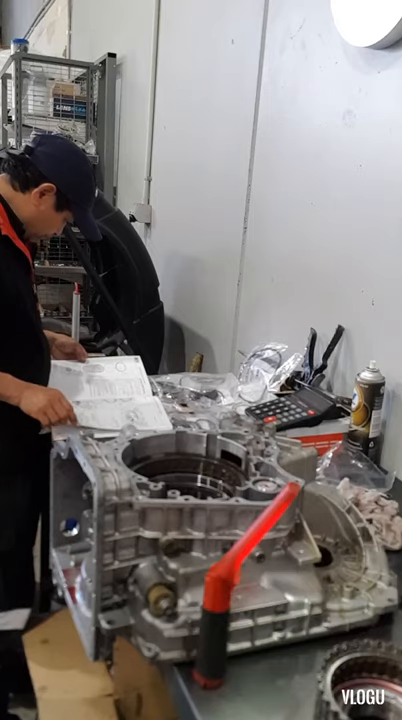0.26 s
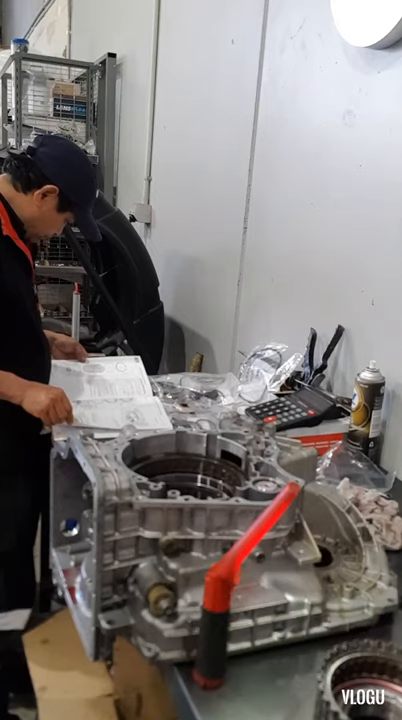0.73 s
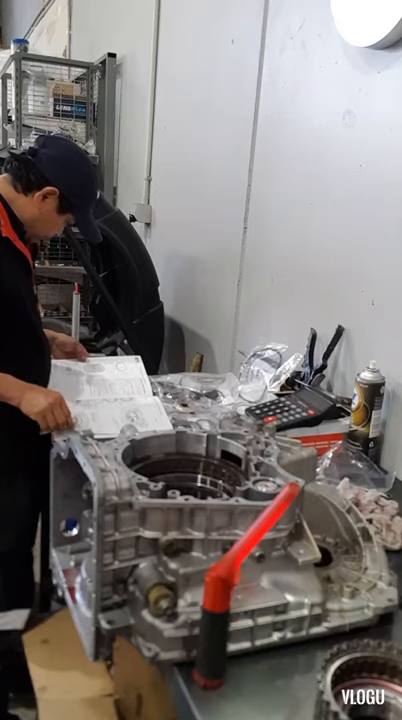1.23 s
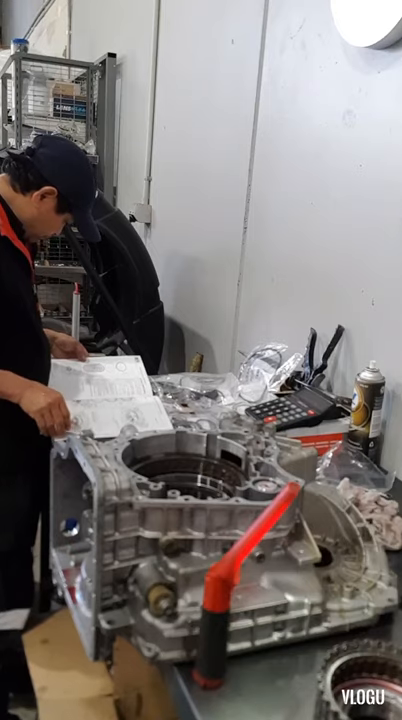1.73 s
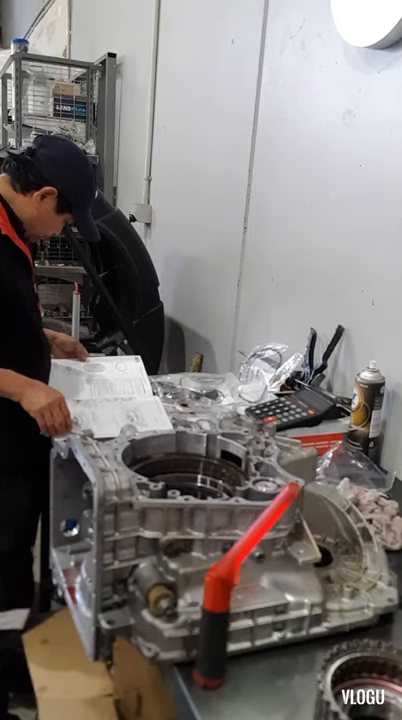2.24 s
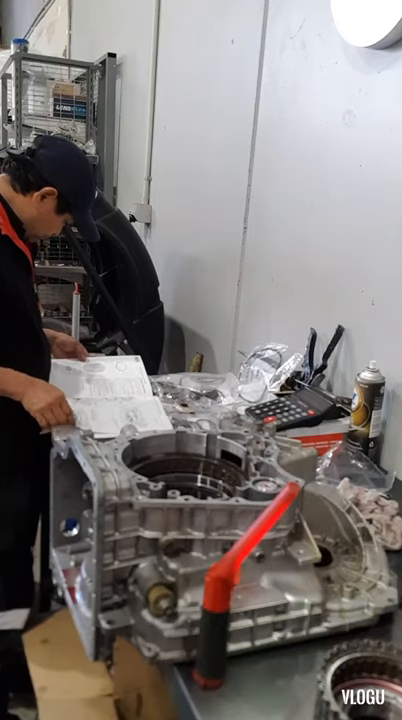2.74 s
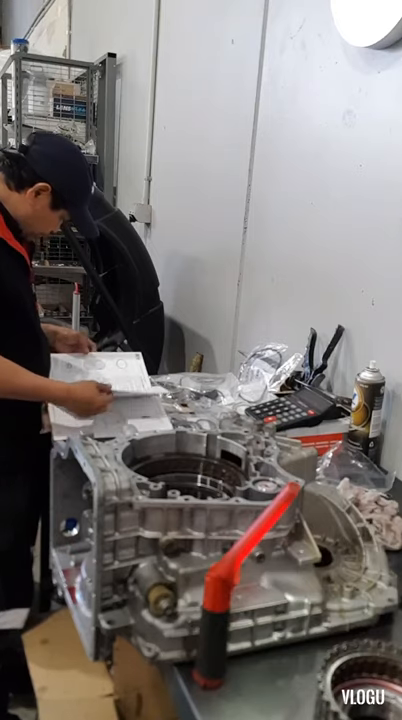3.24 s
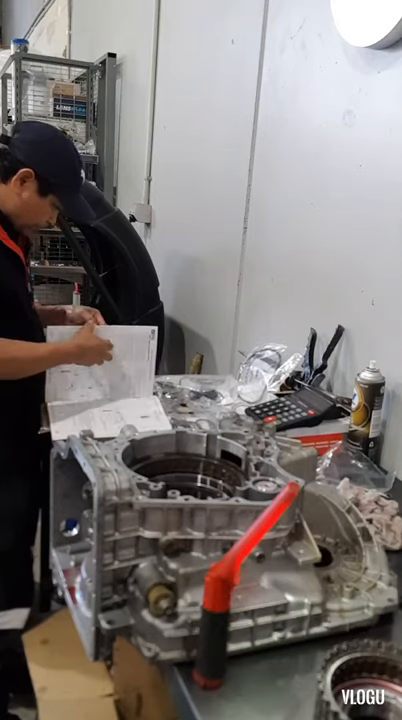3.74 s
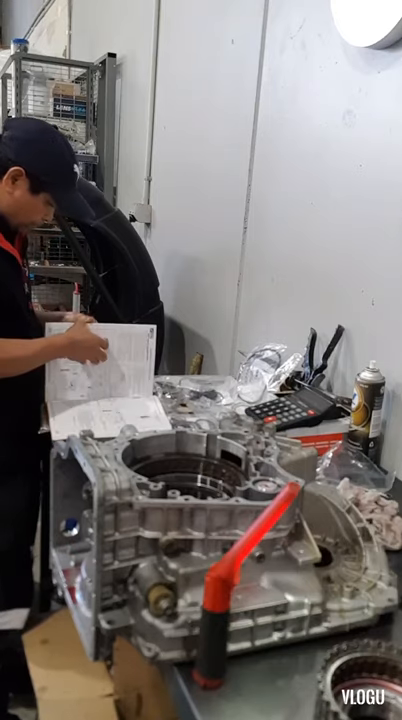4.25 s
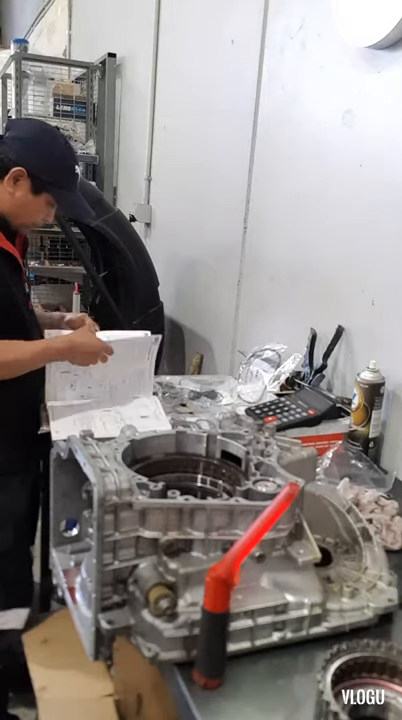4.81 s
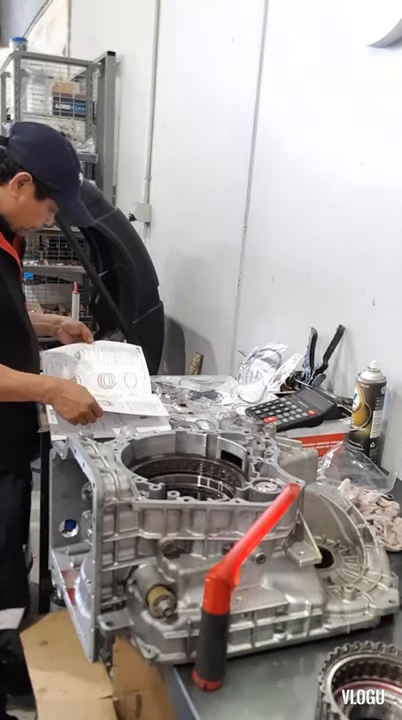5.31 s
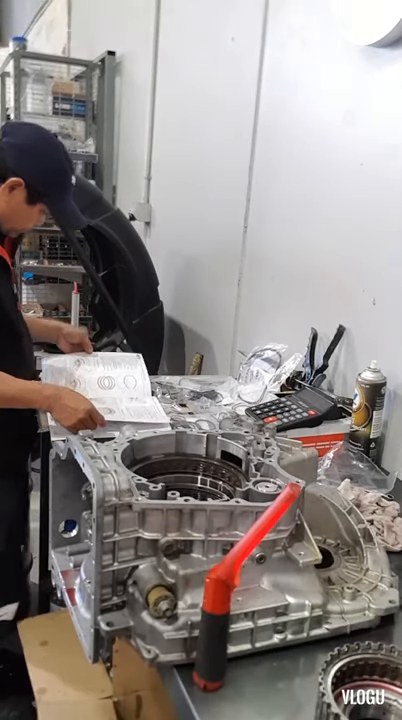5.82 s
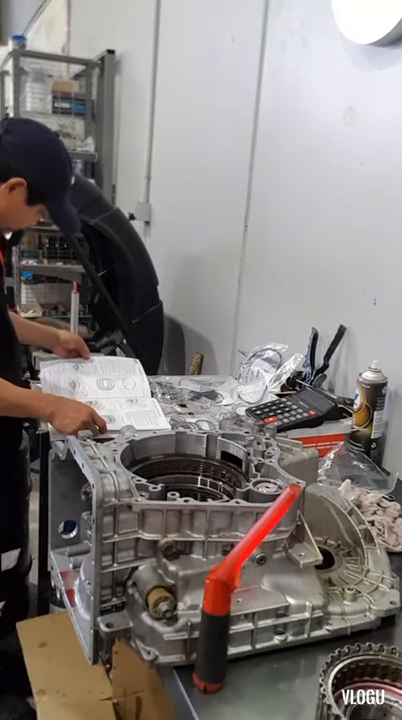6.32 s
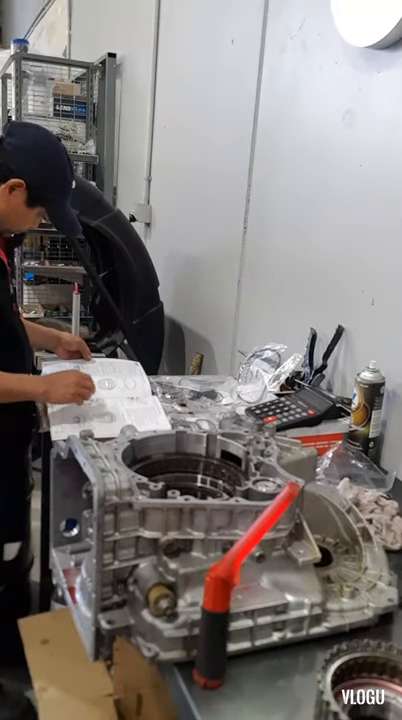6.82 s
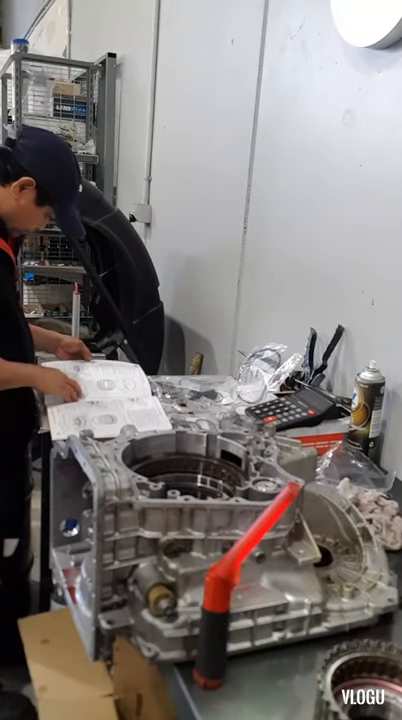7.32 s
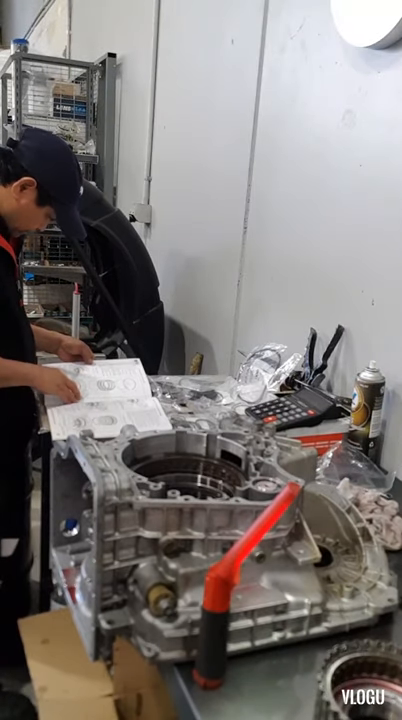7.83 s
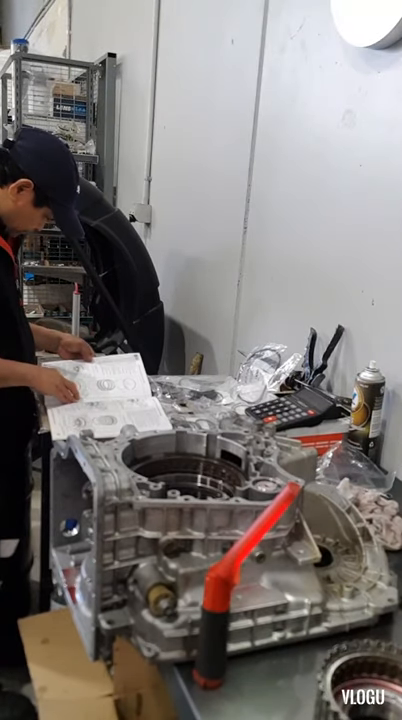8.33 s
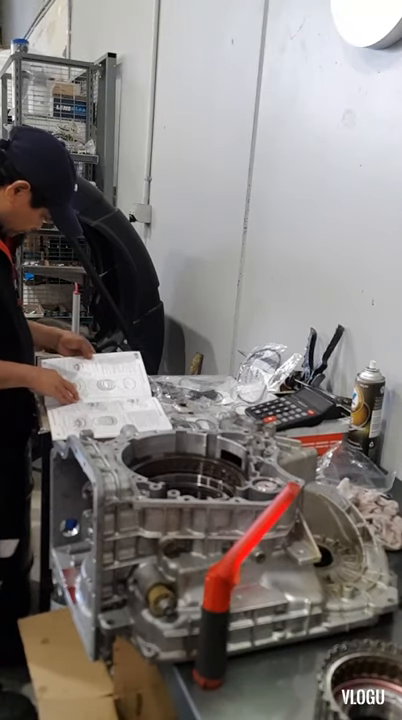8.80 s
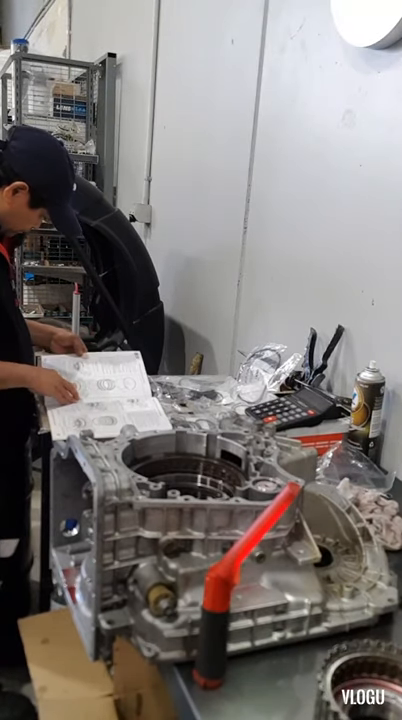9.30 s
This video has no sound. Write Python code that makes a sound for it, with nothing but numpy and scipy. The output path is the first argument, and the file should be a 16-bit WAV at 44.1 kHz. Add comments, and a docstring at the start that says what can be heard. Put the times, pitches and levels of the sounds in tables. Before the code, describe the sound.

An air gun hisses loudly in a hard-walled workshop, first briefly, then in one long blast of about three seconds. A run of short, sharp bursts with a faint whistle follows, each ringing on in the hall. Dull thumps land on a bench among the later bursts. The air then stops, leaving a few distant metal clacks over the low rumble and hum of machines, all picked up by one microphone.

```python
"""An air gun hisses in long and short bursts across a hard-walled workshop, and the hall rings on after each.
The hiss is a turbulent jet behind a snappy valve, with a faint nozzle whistle; on a long pull the hose
pressure sags and the jet dulls. Metal parts clack far off, and things set down on a bench thump its low
modes. Machines rumble and hum underneath. One microphone, the same on both channels."""
import sys
import numpy as np
from scipy import signal
from scipy.fft import rfft, irfft
from scipy.io import wavfile

SR = 44100
rng = np.random.default_rng(int(sys.argv[2]) if len(sys.argv) > 2 else 0)


def store_pcm(level_fs):
    """Save levels as 16-bit WAV."""
    pcm = np.round(np.clip(level_fs, -1, 1) * 32767).astype(np.int16)
    wavfile.write(sys.argv[1], SR, np.atleast_2d(pcm).T)


N = 421596
LEAD = SR // 2  # pre-roll in samples: the jet already blows before time zero

# Trigger pulls. Each row: valve opening, valve shutting and squeeze time in seconds, flow level in dB,
# its ramp over the pull in dB, aim as treble tilt in dB per octave, whistle against the jet in dB.
TRIGGER_PULLS = [(-.5, 0.86, .03, -30, 1, 1, -55), (1.205, 4.094, 0.061, -31, 1.5, 1, -46),
                 (4.262, 4.457, .02, -30, 0.8, 0.5, -34), (4.538, 4.718, .02, -29.5, 0.7, 1, -29),
                 (4.785, 4.953, .02, -29, -0.7, 0.5, -40), (5.06, 5.248, .02, -29, .3, 2, -28.5),
                 (5.762, 5.935, 0.018, -29, -0.6, 1.5, -26.5), (6.026, 6.2, .02, -28.5, -0.9, 1, -29),
                 (6.292, 6.633, 0.036, -28, -0.5, 0.8, -26), (6.81, 7.177, .04, -29, -0.2, 1, -28.5),
                 (7.31, 7.521, 0.045, -29, 0.8, 0.6, -25)]
# Colour of the jet. Each row: frequency in Hz, spectral level in dB.
JET_SPECTRUM = [(500, -35), (900, -28.5), (1420, -18.5), (1750, -13.5), (3100, -9), (3700, -5.5),
                (4200, 0.5), (5080, -0.5), (5940, -6), (6680, -4.5), (7620, -12.5), (9380, -1),
                (10800, 0.5), (12500, -5), (15800, -14.5)]
# Decay of the hall. Each row: frequency in Hz, time to fall 60 dB in seconds.
HALL_DECAY = [(100, 1.4), (500, 1.5), (1500, 1.09), (3000, 1.48), (5000, 1.35), (8000, 0.91), (11000, 0.66),
              (15000, 0.4)]
# Metal clacks. Each row: start in seconds, level in dB, rattle time in seconds, tilt in dB per octave,
# low ring in Hz, its boost in dB, high ring in Hz, its boost in dB.
CLACK_HITS = [(4.925, -49, 0.019, 1, 1750, -3, 4500, 2), (8.27, -57, 0.034, -2.5, 1560, 6, 4500, 6),
              (8.652, -51.5, 0.0069, -2.5, 3350, 15, 10000, 15), (8.670, -46, 0.006, 5, 2580, 10, 11400, 1),
              (9.288, -52.5, 0.007, 0, 10500, 11, 14800, 9), (9.3, -46.5, 0.014, 0, 1340, 3, 4670, 6.5)]
# Colour shared by all clacks. Each row: frequency in Hz, spectral level in dB.
CLACK_SPECTRUM = [(180, -12), (300, -5), (572, -3), (721, -0.5), (1070, -1.5), (1310, 0), (1980, -0.5),
                  (2490, -2), (3520, -14), (4370, -8), (7660, -20), (11600, -17), (15600, -28)]
# Things landing on the bench. Each row: start in seconds, level in dB, hardness as tilt in dB per octave,
# pitch factor for the spot that is hit.
BENCH_HITS = [(5.362, -34, -4.5, 0.8), (5.406, -33, -10, 0.74), (5.583, -47, 0, 1.01),
              (5.7, -44.5, -0.5, 0.95), (6.699, -50, 3, 0.95), (6.71, -35, -2, 1.06),
              (6.743, -37, -5, 1.04), (6.8, -42, -3, 0.95), (7.426, -47.5, 5.5, 0.99),
              (7.446, -42, 0, 1.01), (8.718, -42, -1, 0.93), (9.321, -53, 4, 1.07)]
# Modes of the bench. Each row: frequency in Hz, level in dB, time to fall 60 dB in seconds.
BENCH_MODES = [(71, -5.5, 0.2), (131.5, 0.5, 0.19), (214, -5.5, 0.15), (407, -11, 0.13), (774, -6.5, 0.062)]
# Colour of the machine wash. Each row: frequency in Hz, spectral level in dB.
WASH_SPECTRUM = [(53, -19), (90, 5.5), (117, -33), (148, -13), (238, -13), (352, -17.5), (383, -20),
                 (566, -17), (658, -21.5), (766, -17), (1430, -19), (2360, -22), (5250, -28), (7580, -40.5),
                 (15800, -35)]
# Swells of the distant machines. Each row: time in seconds, wash level in dB, drone level in dB,
# extra body on the wash at 180-340 Hz in dB.
MACHINE_SWELLS = [(0.0, -51.5, -48, 3), (0.69, -52.5, -54, 2.5), (0.93, -53, -48, 2), (1.62, -53, -54, 2),
                  (4.79, -51, -52, 1.5), (5.03, -51.5, -53.5, 0), (5.46, -51, -49.5, 2.5),
                  (5.93, -51, -53.5, 1.5), (6.5, -52.5, -48, 1), (6.84, -54, -57, 1.5),
                  (7.37, -52, -49.5, 0), (8.49, -51, -51.5, 1), (8.89, -51, -46.5, 2),
                  (9.56, -49.5, -50, 0.5)]
# Low drones. Each row: frequency in Hz, width in Hz, relative level in dB.
DRONES = [(41.85, 7.2, -4.5), (58.3, 3.9, -2), (76.7, 3.6, -2.5), (95.2, 8.8, -26)]
# Motor hums and whines. Each row: frequency in Hz, width in Hz, level in dB, on and off times in seconds.
MOTOR_TONES = [(153, 3.9, -74, 7.6, 10), (191.8, 5.2, -70, -1, 10), (352, 6, -67, 7.65, 8.55),
               (576, 9, -72, -1, 10), (700, 6, -64, 8.85, 10), (940, 8, -65, 8.95, 10),
               (1500, 60, -61, 8.85, 10), (11050, 80, -84, 8.22, 8.66), (13450, 70, -77.5, 5, 8.66),
               (15350, 40, -82, 5, 8.66)]

OPEN_S, SHUT_S, WEAK_START_DB = .012, .015, -2.5  # the valve snaps; flow is weaker during the squeeze
SAG_DB, SAG_DB_PER_OCTAVE, SAG_S = -2.5, -0.97, 0.63  # falling hose pressure: quieter and duller
WHISTLE_HZ, WHISTLE_WIDTH_HZ = 1760, 45
DIRECT_DB, DIRECT_DB_PER_OCTAVE = -6, 1.8  # the jet's straight path, tilted around 8 kHz
FIZZ_OFF_S, FIZZ_DROP_DB = 8.7, -4  # the wash over 9 kHz falls as the highest whines stop


def air_gun():
    """Turbulent jet noise behind a quick valve; the aim tilts the treble, and the nozzle whistles."""
    opens, *_, aims, _ = np.transpose(TRIGGER_PULLS)

    def jet_db(hz, t):
        """Jet colour, tilted by the aim and pressure of the current pull; the level flutters slightly."""
        pull = np.maximum(np.searchsorted(opens, t) - 1, 0)
        tilt = aims[pull] + SAG_DB_PER_OCTAVE * pressure_sag(t, opens[pull])
        return curve(JET_SPECTRUM, hz) + tilt * octaves(hz, 8800) + 0.6 * drift(t, top_hz=7.9)

    jet = unit_rms(shaped_noise(jet_db))
    whistle = wavering_tone(WHISTLE_HZ, WHISTLE_WIDTH_HZ, steady=0)
    t, out = (np.arange(N + LEAD) - LEAD) / SR, np.zeros(N + LEAD)
    for start, end, squeeze_s, flow_db, ramp_db, _, whistle_db in TRIGGER_PULLS:
        valve = np.clip((t - start) / OPEN_S, 0, 1) * np.clip((end - t) / SHUT_S, 0, 1)
        squeeze_db = WEAK_START_DB * np.exp(-abs(t - start) / squeeze_s)
        progress = np.clip((t - start) / (end - start), 0, 1)
        flow = gain(flow_db + squeeze_db + SAG_DB * pressure_sag(t, start) + ramp_db * progress)
        out += valve * flow * (jet + gain(whistle_db) * whistle)
    return out


def pressure_sag(t, start):
    """The hose loses pressure once the valve opens: 0 at first, 1 when fully sagged."""
    return 1 - np.exp(-np.maximum(t - start, 0) / SAG_S)


def direct_beam(jet, size=2 ** 19):
    """The jet beams its treble, so the straight path is brighter than what feeds the hall."""
    beam_db = DIRECT_DB + DIRECT_DB_PER_OCTAVE * octaves(np.fft.rfftfreq(size, 1 / SR), 8000)
    return irfft(rfft(jet, size) * gain(beam_db))[:len(jet)]


def hall(send, hop=SR // 4, patterns=14):
    """Dense reflections, each band dying at its own speed; the gun moves, so their pattern keeps changing."""
    hz, t, spectra = signal.stft(rng.standard_normal((patterns, SR)), SR, nperseg=256)
    t60 = curve(HALL_DECAY, hz)[:, None]
    tails = signal.istft(spectra * gain(-60 * t / t60) / np.sqrt(t60), SR, nperseg=256)[1]
    tails *= np.clip(np.arange(tails.shape[1]) / SR / 0.02, 0, 1)  # reflections build over 20 ms
    tails /= np.sqrt((tails ** 2).sum(1).mean())
    padded, out = np.pad(send, (hop, 2 * hop)), np.zeros(len(send) + 5 * SR)
    crossfade = np.sin(np.pi * np.arange(2 * hop) / (2 * hop))  # equal power
    for k, start in enumerate(range(0, len(send) + hop, hop)):
        wet = signal.fftconvolve(padded[start:start + 2 * hop] * crossfade, tails[k % patterns])
        out[start:start + len(wet)] += wet
    return out[hop:][:len(send)]


def metal_clacks(size=8192):
    """Metal parts rattle briefly, each with two broad rings from clusters of close modes."""
    out, t, hz = np.zeros(N + LEAD), np.arange(size) / SR, np.fft.rfftfreq(size, 1 / SR)
    for start, level_db, rattle_s, tilt, low_hz, low_db, high_hz, high_db in CLACK_HITS:
        colour_db = curve(CLACK_SPECTRUM, hz) + tilt * octaves(hz, 2000)
        for ring_hz, ring_db in (low_hz, low_db), (high_hz, high_db):
            colour_db += ring_db / (1 + ((hz / ring_hz - 1) / .09) ** 4)
        burst = rfft(rng.standard_normal(size) * t * np.exp(-t / rattle_s))  # swells, then dies
        rattle = unit_rms(irfft(burst / abs(burst) * gain(colour_db)))  # burst's timing, metal's colour
        slot = out[LEAD + round(start * SR):][:size]
        slot += gain(level_db) * rattle[:len(slot)]
    return out


def bench_thumps():
    """Each landing rings the bench modes; harder blows favour the upper ones."""
    out, t = np.zeros(N + LEAD), np.arange(SR // 5) / SR
    soft_attack = np.clip(t / 0.003, 0, 1)
    for start, level_db, hardness, pitch in BENCH_HITS:
        ring = sum(gain(db + hardness * octaves(hz, 96) - 60 * t / t60)
                   * np.sin(2 * np.pi * hz * pitch * t) for hz, db, t60 in BENCH_MODES)
        out[LEAD + round(start * SR):][:len(t)] += gain(level_db) * ring * soft_attack
    return out


def machines():
    """A bed of distant machines: a noisy wash, low drones, and motor tones that come and go."""
    times, wash_db, drone_db, body_db = np.transpose(MACHINE_SWELLS)

    def colour_db(hz, t):
        """Wash colour, with a shifting low-mid body and a late drop in fizz."""
        body = np.interp(t, times, body_db) * (hz > 180) * (hz < 340)
        return curve(WASH_SPECTRUM, hz) + body + FIZZ_DROP_DB * (hz > 9000) * (t > FIZZ_OFF_S)

    t = (np.arange(N + LEAD) - LEAD) / SR
    wash = unit_rms(shaped_noise(colour_db, size=2048))
    drones = unit_rms(sum(gain(db) * wavering_tone(hz, width, steady=0.72) for hz, width, db in DRONES))
    out = gain(np.interp(t, times, wash_db)) * wash + gain(np.interp(t, times, drone_db)) * drones
    for hz, width, db, start, end in MOTOR_TONES:
        fade = np.clip(np.minimum(t - start, end - t) / 0.051, 0, 1)
        out += gain(db) * wavering_tone(hz, width, steady=0.7) * fade
    return out


def shaped_noise(shape_db, size=1024):
    """Noise whose colour moves: shape_db(column of Hz, row of seconds) sets its short-time spectra."""
    hz = np.fft.rfftfreq(size, 1 / SR)[:, None]
    t = (np.arange(4 * (N + LEAD) // size + 5) * size / 4 - LEAD) / SR
    real, imag = rng.standard_normal((len(t), len(hz), 2)).T
    spectra = (real + 1j * imag) * gain(shape_db(hz, t))
    return signal.istft(spectra, nperseg=size, noverlap=size * 3 // 4)[1][:N + LEAD]


def wavering_tone(hz, width_hz, steady):
    """A narrow band of noise around hz; steady, from 0 to 1, irons out its level."""
    samples, step = np.arange(N + LEAD), 64
    pole = np.exp(-np.pi * width_hz * step / SR)
    waver = signal.lfilter([1], [1, -pole], rng.standard_normal((N // 32, 2)) @ [1, 1j])[-N // 48:]
    waver = np.interp(samples / step, np.arange(len(waver)), waver / abs(waver) ** steady)
    return unit_rms(abs(waver) * np.cos(np.angle(waver) + 2 * np.pi * hz * samples / SR))


def drift(t, top_hz):
    """A slow random wander of rms 1."""
    rates = np.geomspace(.2, top_hz, num=24)
    return unit_rms(sum(np.sin(2 * np.pi * (hz * t + rng.random())) / np.sqrt(hz) for hz in rates))


def curve(points, hz):
    """Reads a table on a log-frequency axis."""
    point_hz, values = np.transpose(points)
    return np.interp(np.log(hz + 1), np.log(point_hz + 1), values)


def octaves(hz, centre_hz):
    """Octaves above a centre, with a 20 Hz offset to stay finite at zero."""
    return np.log2((hz + 20) / centre_hz)


def gain(db):
    """Turns dB into amplitude."""
    return 10 ** (np.asarray(db) / 20)


def unit_rms(x):
    """Scales to rms 1."""
    return x / np.sqrt(np.mean(x ** 2) + 1e-20)


def scene():
    """Air gun up front, clacks mostly wet, thumps mostly dry, all over the machine bed."""
    jet, clacks, thumps = air_gun(), metal_clacks(), bench_thumps()
    direct = direct_beam(jet) + gain(-5.5) * clacks + thumps
    mix = direct + hall(jet + clacks + gain(-6.5) * thumps) + machines()
    return np.tile(mix[LEAD:], (2, 1))


def record(dry, low_cut_hz=32, high_cut_hz=15740):
    """The microphone drops the deepest bass; a steep high cut trims the top."""
    thinned = signal.sosfilt(signal.butter(4, low_cut_hz, "highpass", fs=SR, output="sos"), dry)
    high_cut = signal.firwin(1023, high_cut_hz, window=("kaiser", 9), fs=SR)
    return signal.oaconvolve(thinned, high_cut[None], "same")


dry = scene()
out = record(dry)
store_pcm(out)
```